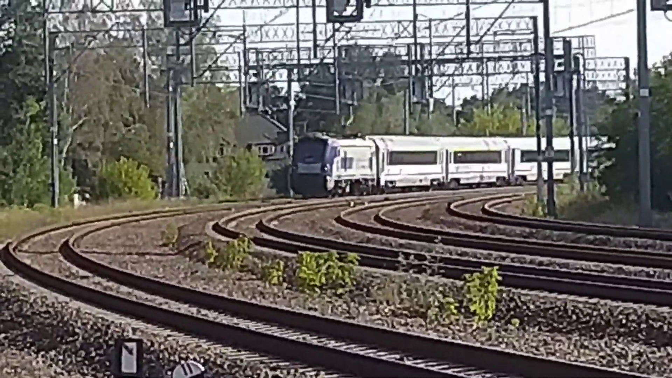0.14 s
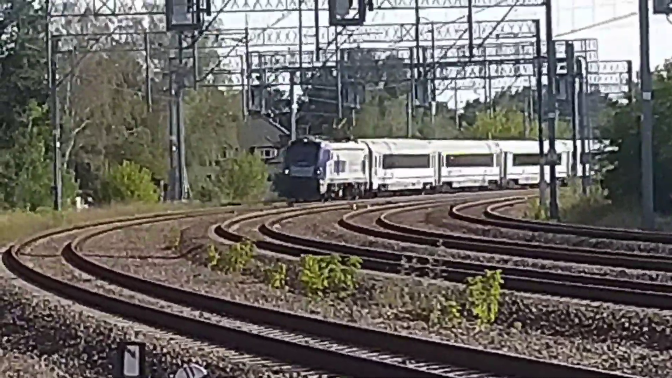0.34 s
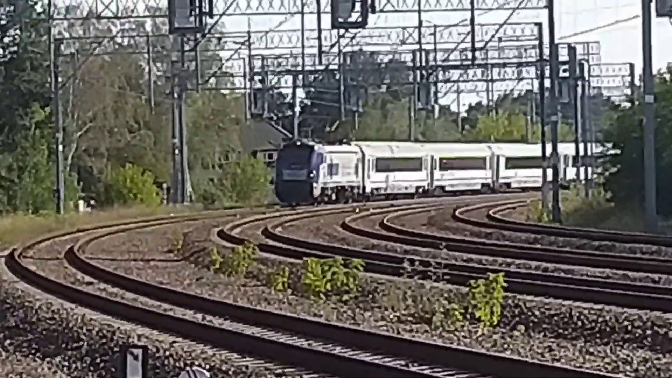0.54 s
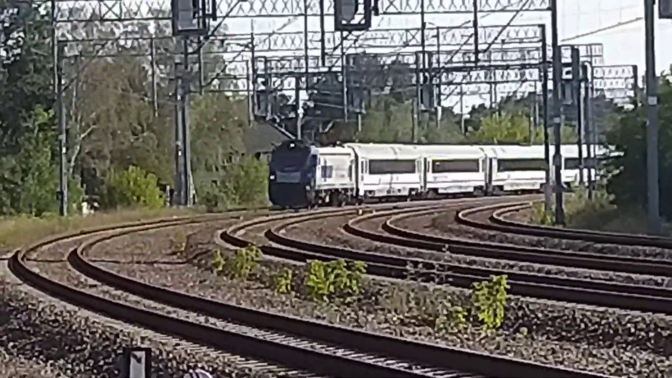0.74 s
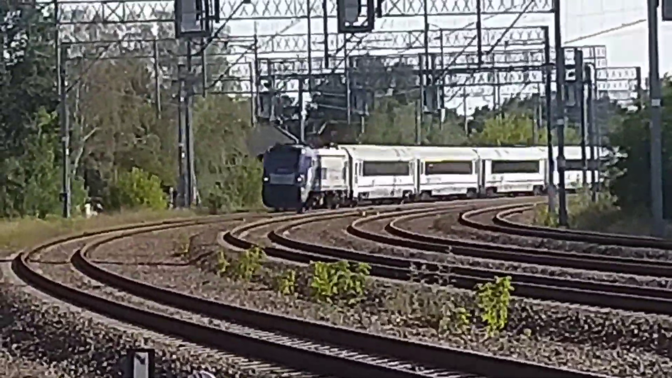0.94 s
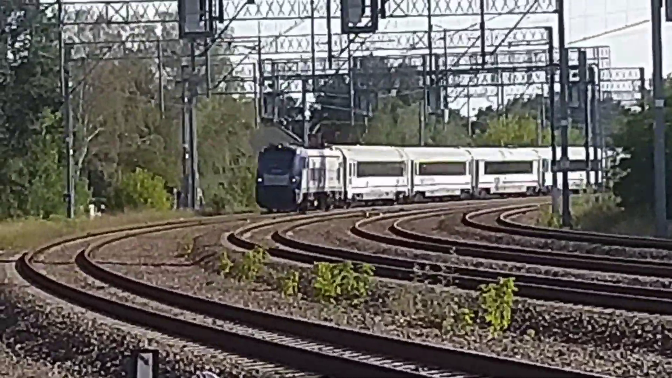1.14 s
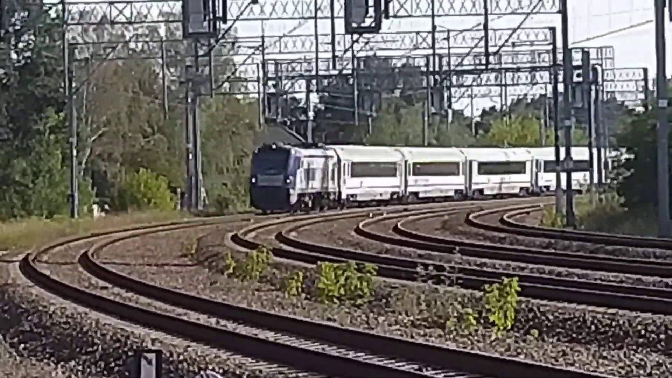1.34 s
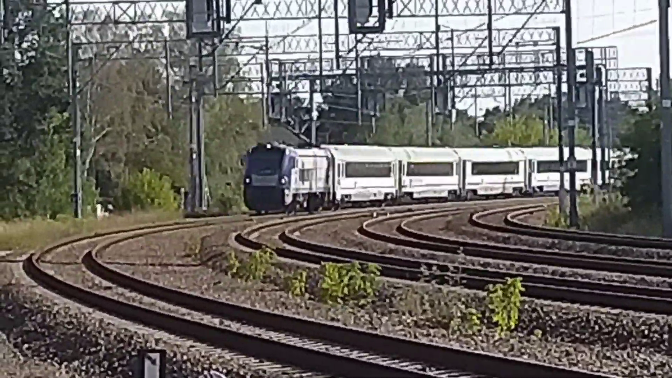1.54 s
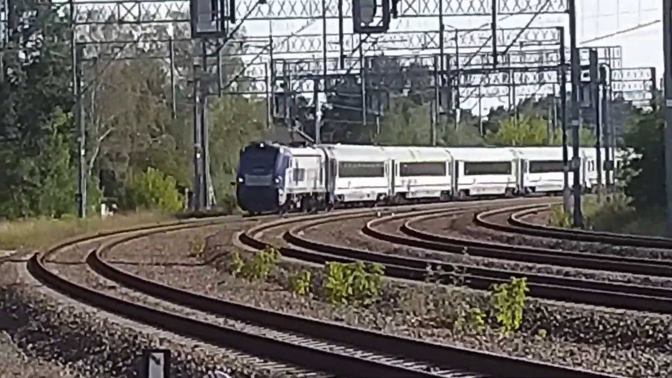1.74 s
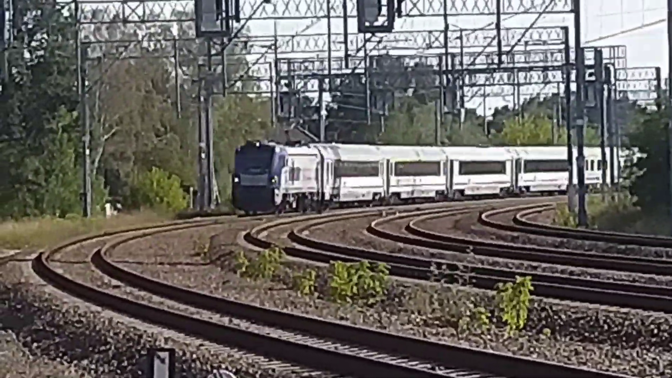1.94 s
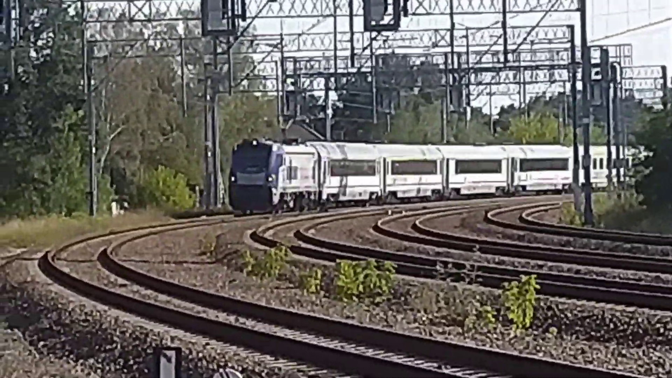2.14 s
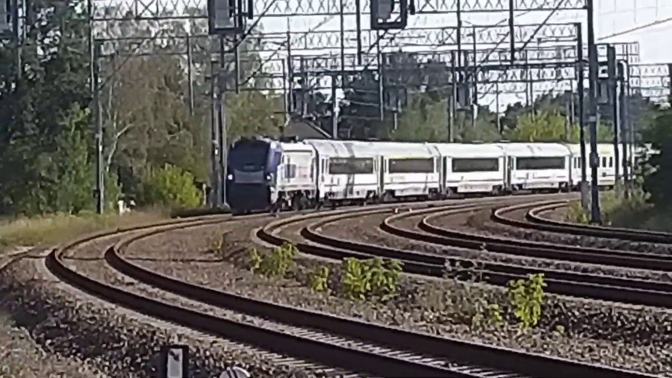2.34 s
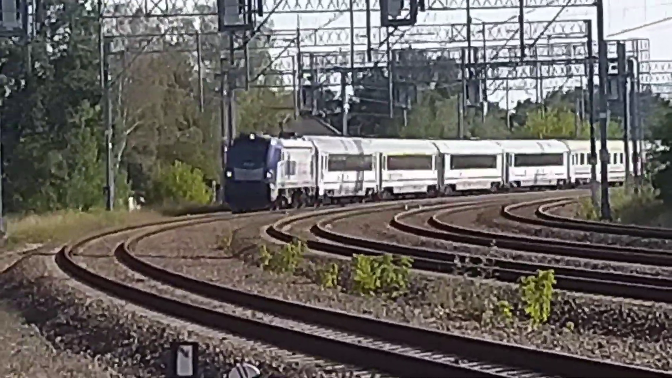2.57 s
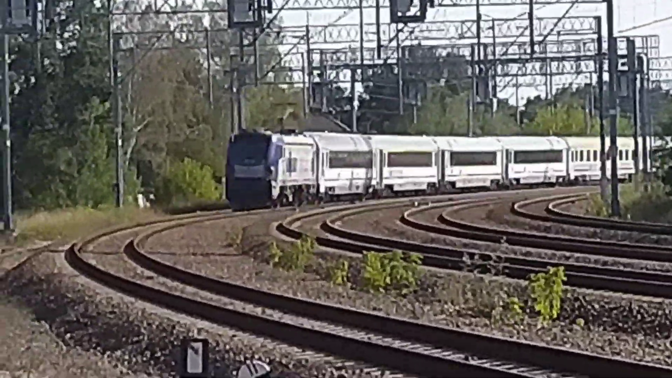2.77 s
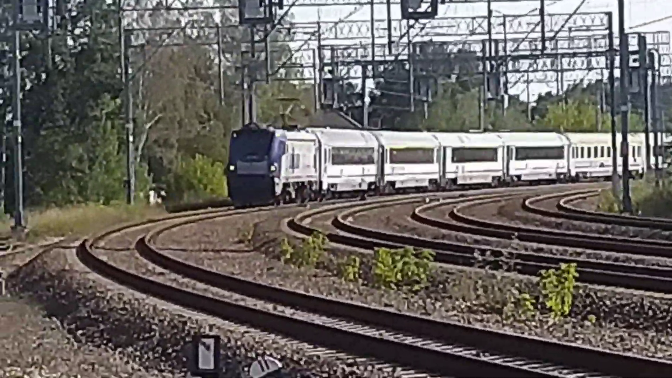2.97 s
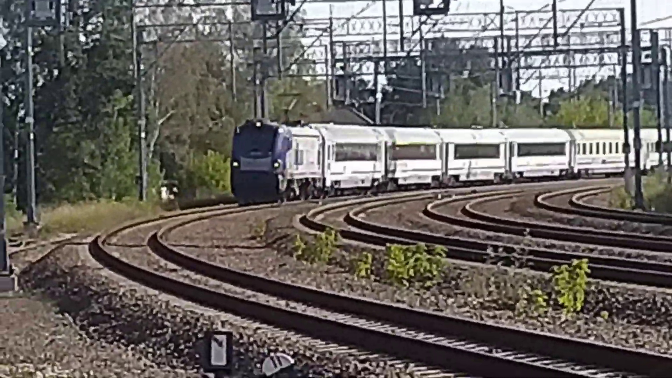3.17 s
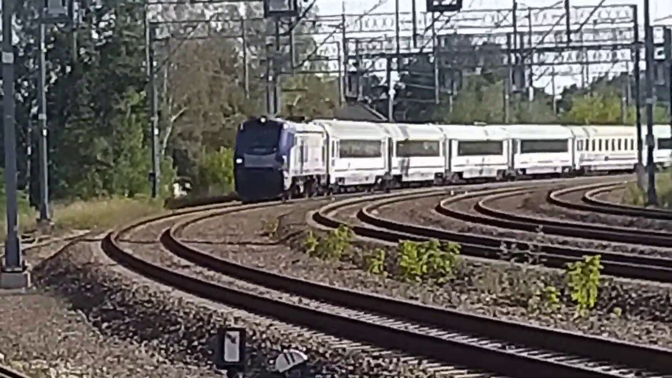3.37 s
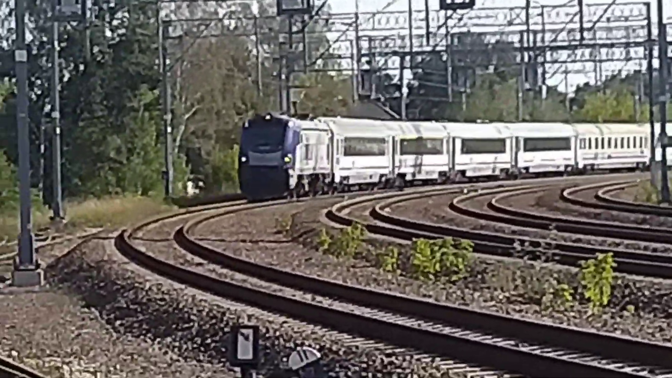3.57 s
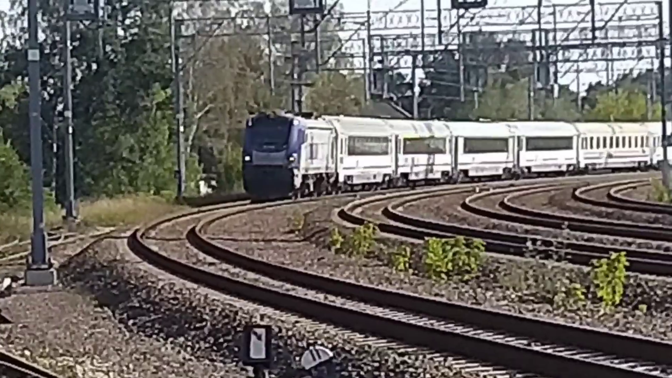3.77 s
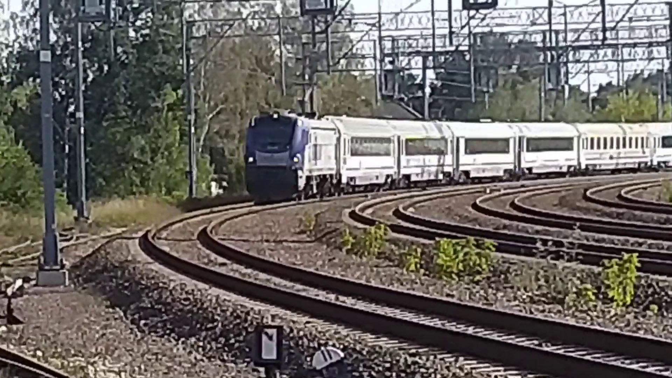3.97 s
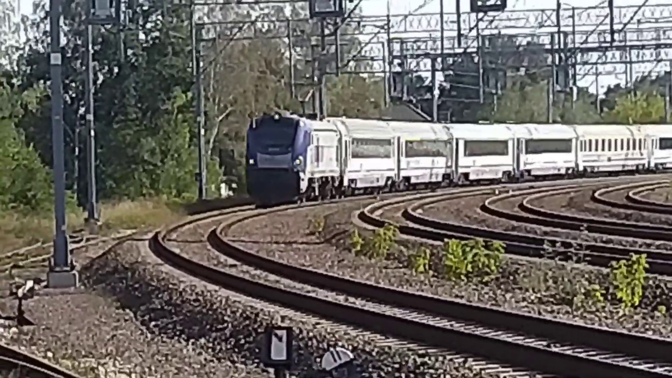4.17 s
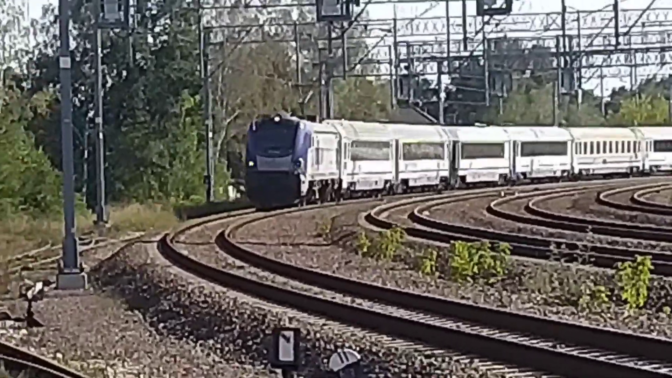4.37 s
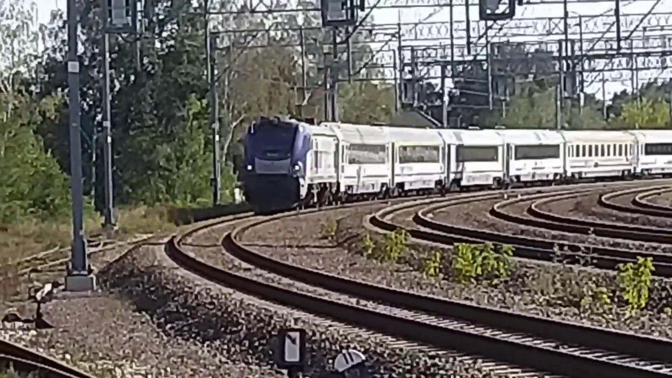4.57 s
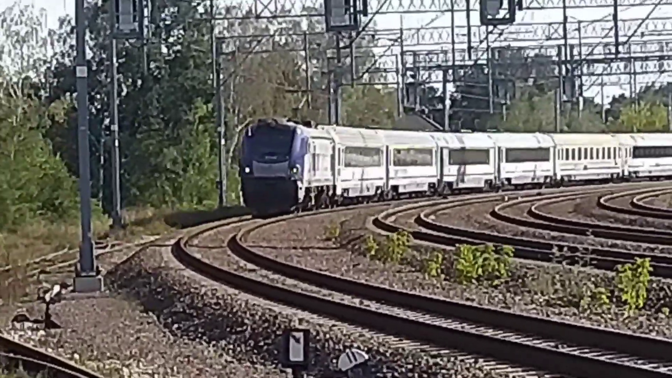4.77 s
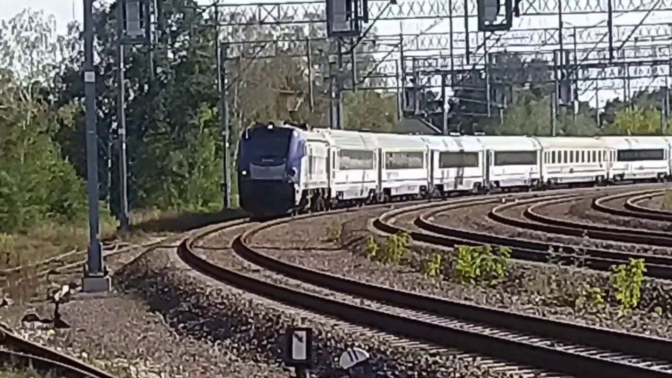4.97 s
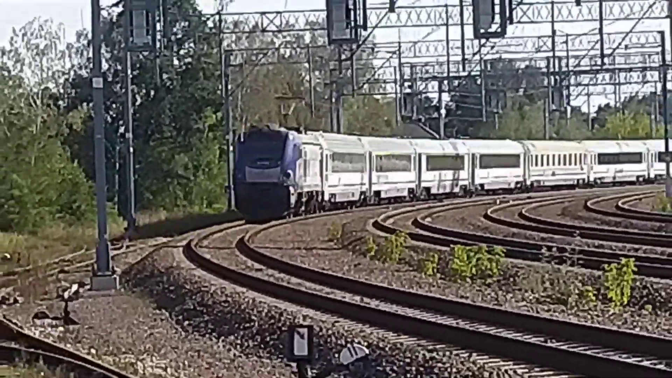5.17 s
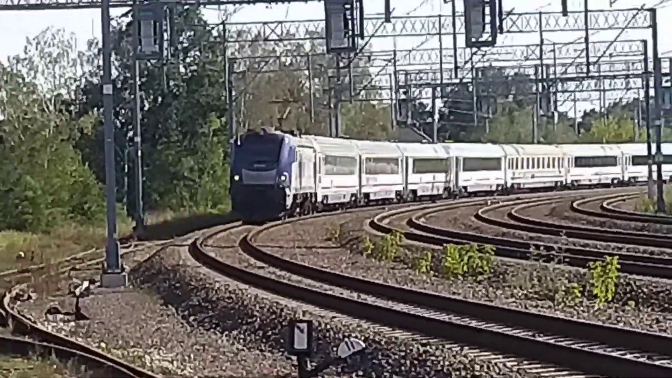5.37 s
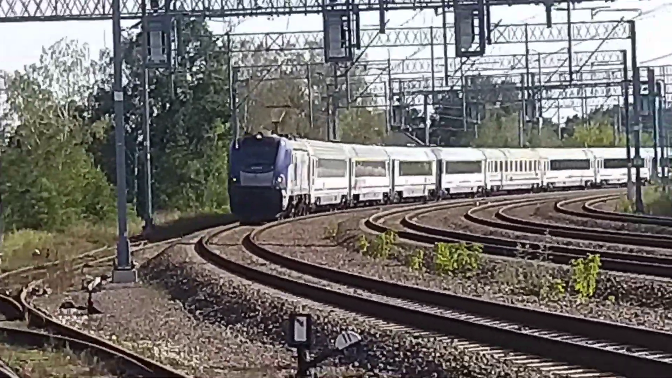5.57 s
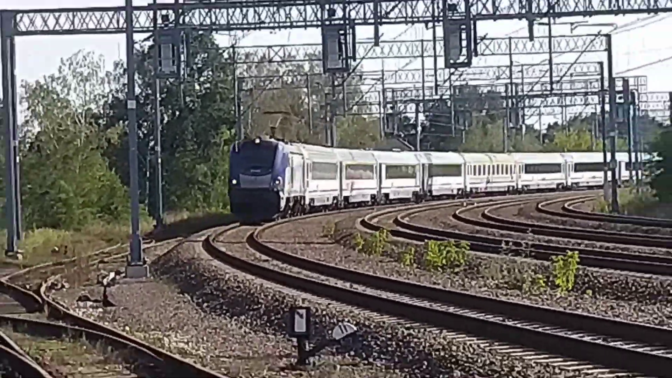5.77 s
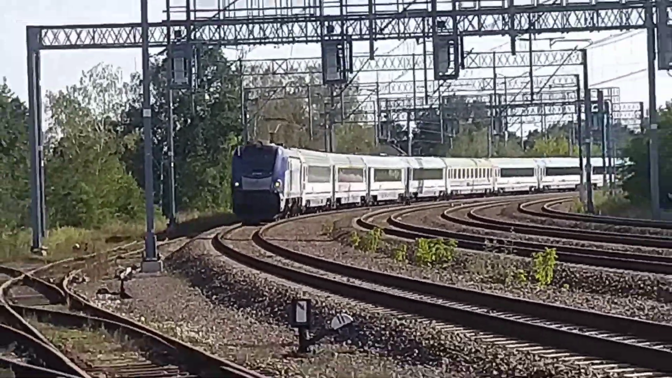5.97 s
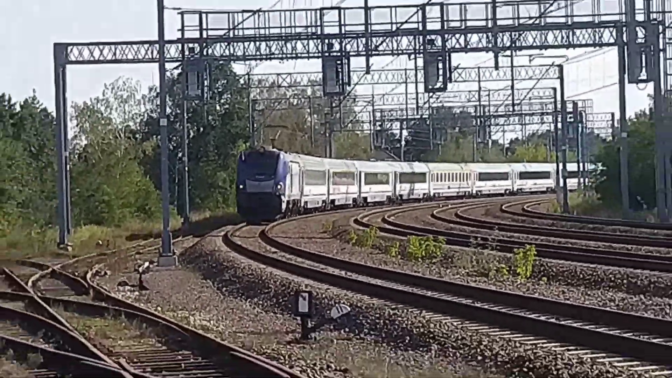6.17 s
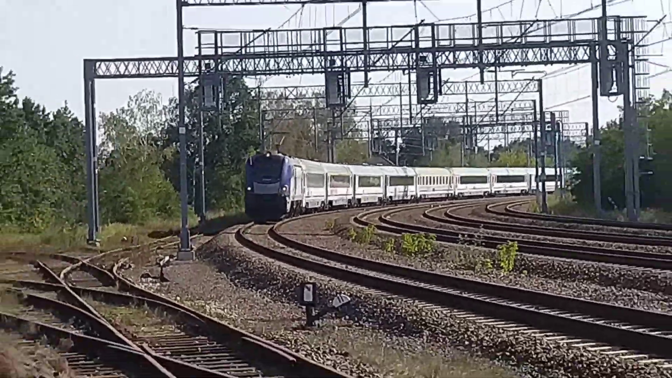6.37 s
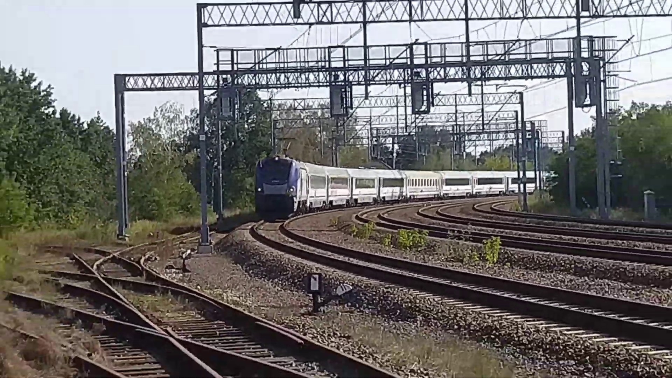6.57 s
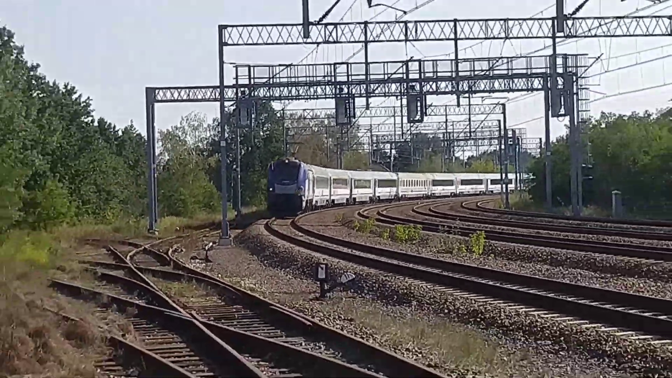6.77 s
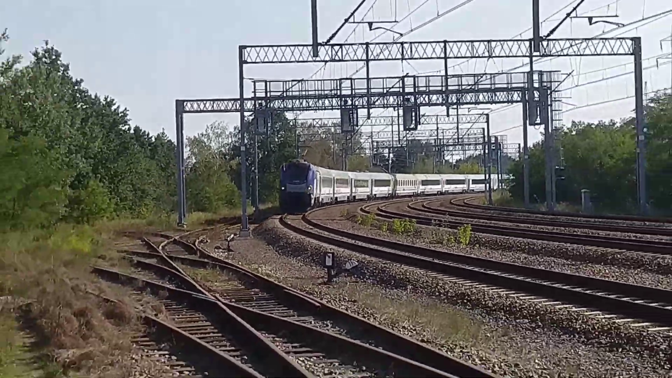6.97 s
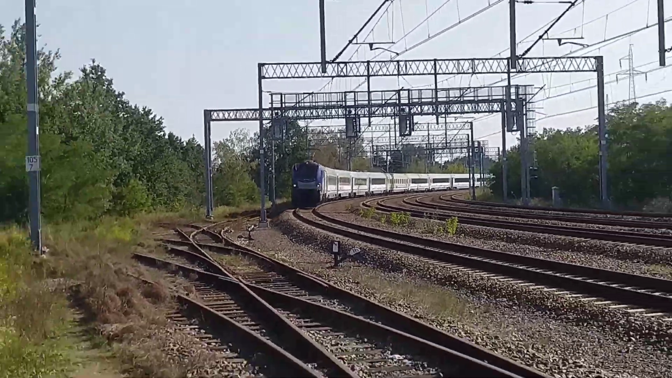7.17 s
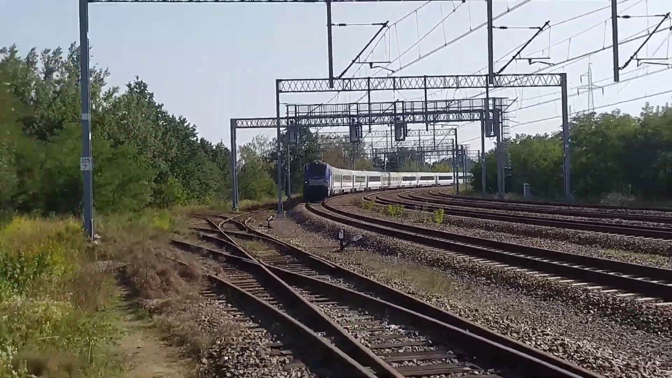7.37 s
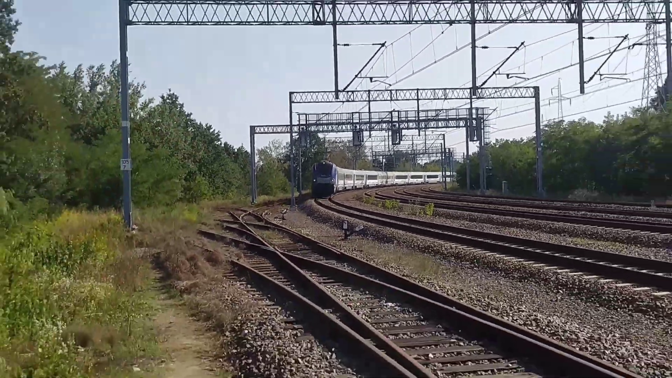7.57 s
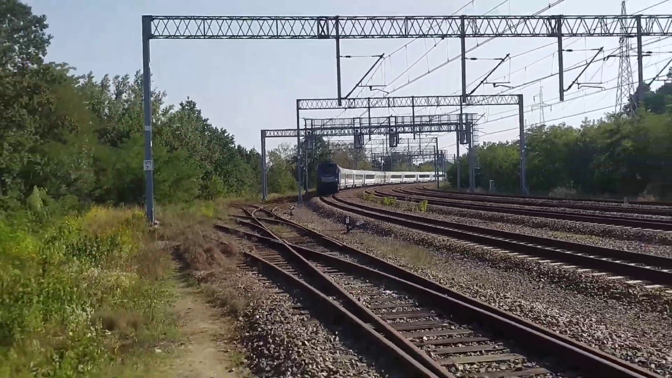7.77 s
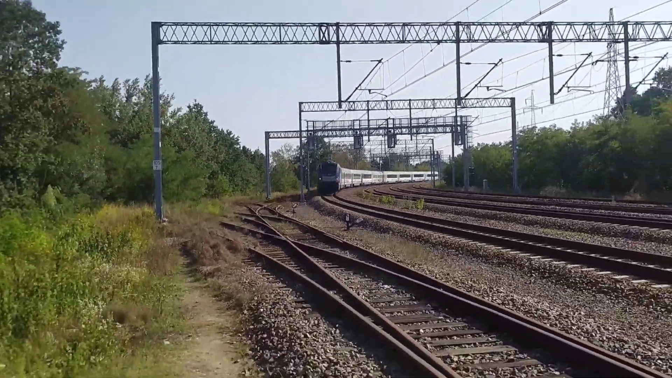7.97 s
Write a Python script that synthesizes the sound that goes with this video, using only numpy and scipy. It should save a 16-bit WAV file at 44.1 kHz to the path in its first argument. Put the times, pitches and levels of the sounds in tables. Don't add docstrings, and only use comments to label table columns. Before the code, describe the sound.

Outdoors beside a curved railway, a distant low hum and faint rail ringing open the scene. Brief, tiny high hisses come first, then from about one second longer sizzling grabs with a thin, extremely high squeal. The metallic rolling and airy roar of an approaching train grow steadily, pulsing about five times a second. A short knock on the handheld microphone comes past the middle; afterwards the hiss is stronger and more broken. Stereo treble leans right.

```python
import sys
import numpy as np
from scipy import signal
from scipy.fft import rfft, irfft, next_fast_len
from scipy.io import wavfile
from scipy.ndimage import uniform_filter1d, map_coordinates

SR = 44100
rng = np.random.default_rng(int(sys.argv[2]) if len(sys.argv) > 2 else 0)


def materialize(psi):
    bounded = np.clip(np.atleast_2d(psi).T, -1, 1)
    quanta = np.round(bounded * 32767).astype(np.int16)
    wavfile.write(sys.argv[1], SR, quanta)


def volts_from_decibels(level):
    exponent = np.asarray(level, float) / 20
    return 10 ** exponent


N = 353858
TIME_S = np.arange(N) / SR
WHEEL_TURN_S = 0.2003

# bite_s, release_s, hiss_db, sag_db_per_s
FLANGE_GRABS = [(0.224, .38, -64, 5), (0.401, 0.416, -64, 2), (0.462, 0.472, -62.5, 0),
                (0.52, .57, -63.5, 3), (0.798, 2.07, -53, 1), (2.129, 2.502, -52.5, -1.5),
                (2.581, 2.848, -52, 2), (2.928, 4.57, -52, -0.7), (4.878, 5.275, -45, 1),
                (5.421, 5.631, -48, -1.5), (5.892, 5.99, -49, -5), (6.061, 6.137, -46, -3),
                (6.226, 6.26, -47.5, -2), (6.321, 6.79, -46, -1), (6.899, 7.18, -43.5, 25),
                (7.245, 7.453, -46.5, 23), (7.534, 7.598, -45.5, 21), (7.674, 8.1, -48.5, 0.5)]


def at_hz(points, hz):
    point_hz, value = np.transpose(points)
    return np.interp(np.log(hz + 1), np.log(point_hz + 1), value)


def rms_one(x):
    return x / np.sqrt(np.mean(x ** 2) + 1e-20)


def evened(spectrum, size):
    return spectrum / np.sqrt(uniform_filter1d(abs(spectrum) ** 2, size=size))


def shaped(x, spectrum, modes=()):
    size = next_fast_len(N)
    hz = np.arange(size // 2 + 1) * SR / size
    inside = (hz > spectrum[0][0]) & (hz < spectrum[-1][0])
    gain = volts_from_decibels(at_hz(spectrum, hz)) * inside
    for centre, width, db in modes:
        gain = gain * (1 + (volts_from_decibels(db) - 1) / (1 + (2 * (hz - centre) / width) ** 2))
    return rms_one(irfft(rfft(x, size) * gain, size)[:N])


def drift(rate_hz):
    knots = rng.standard_normal(1200)
    return map_coordinates(knots, [TIME_S * rate_hz], order=3, mode="wrap")


def resonate(x, hz, width_hz):
    radius = np.exp(-np.pi * width_hz / SR)
    return signal.lfilter([1, 0, -1], [1, -2 * radius * np.cos(2 * np.pi * hz / SR), radius * radius], x)


def nearness():
    # time_s, level_db
    approach = [
        (0, -50.5),
        (3, -44.5),
        (6.1, -38),
        (8.02, -36),
    ]
    ring_db = np.interp(TIME_S, *np.transpose(approach))
    return ring_db, ring_db - ring_db[-1]


def swell(before_db, step_db, rate_db, lag=0):
    near_rail_s, crossing_s = 4.2, 0.87
    t = TIME_S - near_rail_s - lag
    return before_db + step_db * np.clip(t / crossing_s, 0, 1) + rate_db * np.maximum(t - crossing_s, 0)


def distant_hum():
    # hum_hz, density_db_per_hz
    hum_spectrum = [(12, -43.5), (20, -9.5), (38, -2.5), (51, 4), (63, -3.5), (87, -8.5), (201, -6.5),
                    (269, -14), (302, -11.5), (375, -16.5), (420, -14), (550, -21.5), (920, -120)]
    return volts_from_decibels(-50.5) * shaped(rng.standard_normal(N), hum_spectrum)


def faint_air():
    air_spectrum = [(5000, 8), (8000, 6.5), (12000, 3.0), (15000, -3.0)]   # Hz, dB per Hz
    level_db = -69.5 + 0.43 * nearness()[1]
    return volts_from_decibels(level_db) * shaped(rng.standard_normal(N), air_spectrum)


def far_tones():
    # tone_hz, wander_hz, level_db, fade_start_s, fade_db
    machine_tones = [
        (51, 1, -50.5, 1.25, -7),
        (441, 1.2, -62, 1.2, -9),
    ]
    out = np.zeros(N)
    for hz, wander_hz, db, until_s, drop_db in machine_tones:
        level_db = db + drop_db * np.clip(5 * (TIME_S - until_s), 0, 1)
        flutter = volts_from_decibels(1.2 * drift(2.0))
        phase = 2 * np.pi * np.cumsum(hz + wander_hz * drift(2.5)) / SR
        out += volts_from_decibels(level_db) * flutter * np.sin(phase)
    return out


def thump_and_knock():
    # start_s, peak_db, mode_hz, t60_s
    knocks = [
        (1.24, -26, 34, 0.16),
        (4.669, -13.5, 317, 0.016),
    ]
    out = np.zeros(N)
    for start_s, db, hz, t60_s in knocks:
        t = np.maximum(TIME_S - start_s, 0)
        decay = volts_from_decibels(db - 60 * t / t60_s)
        attack = 1 - np.exp(-t * hz * 0.58)
        upper_mode = np.sin(2 * np.pi * 2.7 * hz * t) * np.exp(-t * hz * 0.7)
        out += decay * attack * (np.sin(2 * np.pi * hz * t) + upper_mode)
    return out


def surroundings():
    return distant_hum() + faint_air() + far_tones() + thump_and_knock()


def tread_roughness(memory, fresh):
    bumps = rng.standard_normal((100, round(WHEEL_TURN_S * SR)))
    turns = signal.lfilter([np.sqrt(1 - memory ** 2)], [1, -memory], bumps, axis=0)
    rough = turns[50:].ravel()[:next_fast_len(N)]
    rough = rough + fresh * rng.standard_normal(len(rough))
    return rms_one(irfft(evened(rfft(rough), size=80), len(rough))[:N])


def worn_spots(spots):
    out, turns = np.zeros(N), np.arange(40)
    for place, hz, width_hz, db in spots:
        knocks = np.full(N, 1e-18)
        struck = ((turns + place) * WHEEL_TURN_S * SR).astype(int)
        knocks[np.minimum(struck, N - 1)] = volts_from_decibels(rng.normal(0, 1.8, 40))
        ring = resonate(resonate(knocks, hz, width_hz), hz, width_hz)
        out += volts_from_decibels(db) * rms_one(ring)
    return out


def rail_damping(x):
    gain_db = nearness()[1]
    low_db, high_db = -0.5 + 0.15 * gain_db, -1.77 - 0.39 * gain_db
    low = signal.sosfiltfilt(signal.butter(6, 830, "low", fs=SR, output="sos"), x)
    high = signal.sosfiltfilt(signal.butter(6, 1080, "high", fs=SR, output="sos"), x)
    return x + (volts_from_decibels(low_db) - 1) * low + (volts_from_decibels(high_db) - 1) * high


def rolling():
    # band_hz, density_db_per_hz
    rail_bands = [(500, -22), (580, -15), (602, -8), (655, -6), (688, -15), (706, -5), (870, -3),
                  (1000, -2), (1060, -7), (1200, -4.5), (1318, -2), (1355, -26), (1500, -40)]
    # band_hz, density_db_per_hz
    lowest_band = [(330, -30), (400, -15), (440, -8), (475, 0), (490, -2), (501, -16), (560, -30)]
    # mode_hz, width_hz, peak_db
    rail_modes = [(654, 11, 3), (772, 30, 3), (810, 12, 3), (873, 11, 9.5), (907, 10, 3), (968, 11, 4),
                  (1000, 12, 3), (1100, 50, 4.5), (1197, 12, 3), (1232, 16, 4), (1270, 14, 3),
                  (1295, 12, 3)]
    # place_on_tread (0-1), mode_hz, width_hz, level_db (re ring)
    tread_spots = [(.36, 873, 18, -5.5), (.92, 873, 20, -7.5), (.73, 873, 35, -16), (.96, 772, 32, -15),
                   (.5, 772, 26, -14), (.73, 772, 40, -18), (.33, 968, 32, -16), (.68, 968, 30, -17),
                   (.98, 968, 35, -17), (.35, 1230, 45, -18), (.9, 1200, 45, -19), (.22, 654, 24, -19)]
    # place_on_tread (0-1), mode_hz, width_hz, level_db (re band)
    low_spots = [(.9, 473, 24, -6), (.26, 473, 30, -9)]
    # band_hz, density_db_per_hz
    roar_spectrum = [(200, -22.5), (500, -7), (1000, 2.5), (1400, -8), (1570, -3.5), (1630, -5.5),
                     (1700, -1.5), (1790, -8), (2050, -6.5), (2400, 0.5), (2650, -8), (3250, -16.5),
                     (3750, -19.5), (3900, -20.5), (4650, -21), (7000, -22.5)]
    ring_db, gain_db = nearness()
    low_db = -49 + 1.7 * gain_db
    roar_db = -41.5 + 0.71 * gain_db + 0.084 * drift(7)
    rough = tread_roughness(memory=0.88, fresh=0.75)
    ring = volts_from_decibels(1.5) * shaped(rough, rail_bands, rail_modes) + worn_spots(tread_spots)
    low = volts_from_decibels(1.0) * shaped(rough, lowest_band) + worn_spots(low_spots)
    roar = shaped(rng.standard_normal(N), roar_spectrum)
    return volts_from_decibels(ring_db) * rail_damping(ring) + volts_from_decibels(low_db) * low + volts_from_decibels(roar_db) * roar


def grip(lag):
    bite_s = 0.002
    t = np.arange(0, N, 16) / SR - lag
    bite, release, db, sag = np.transpose(FLANGE_GRABS)[:, :, None]
    slide_db_per_s = np.where(db < -58, 422, 172)
    held = db - sag * (np.minimum(t, release) - bite)
    after = slide_db_per_s * np.maximum(t - release, 0)
    ahead = 30 * np.maximum(bite - t, 0) / bite_s
    each = held - after - ahead
    rub = swell(before_db=-71, step_db=7.5, rate_db=0, lag=0.8)[::16]
    return np.interp(np.arange(N) / 16, np.arange(len(t)), np.maximum(each.max(axis=0), rub))


def flange_hiss():
    # hiss_hz, density_db_per_hz
    hiss_spectrum = [(8900, -58), (9200, -21.5), (9500, -23.5), (9750, -26), (10800, -32.5), (11400, -13),
                     (12200, 3.5), (12700, -0.5), (13300, 3.5), (14000, -7), (14700, -9), (15200, -28)]
    # strip_hz, width_hz, peak_db
    hiss_strip = [(9490, 170, 5)]
    # hiss_hz, density_db_per_hz
    near_spectrum = [(8850, -29.5), (9050, -6.5), (9400, -13), (9700, -25), (10200, -13), (10500, -7.5),
                     (11000, -7), (11800, 5), (12400, -23.5)]
    noise, grip_db = rng.standard_normal(N), grip(0)
    chatter = volts_from_decibels(1.2 * drift(60) + 1.1 * drift(140))
    near_db = swell(before_db=-23, step_db=8.8, rate_db=3)
    hiss = volts_from_decibels(grip_db - 3.0) * chatter * shaped(noise, hiss_spectrum, hiss_strip)
    return hiss + volts_from_decibels(grip_db + near_db) * shaped(noise[::-1], near_spectrum)


def wheel_squeal():
    # mode_hz, width_hz, level_db
    squeal_modes = [(12721, 1.5, 0), (12688, 8, -13), (12814, 9, -11), (12845, 14, -10), (13050, 12, -17),
                    (13190, 12, -17), (11914, 12, -21), (13755, 10, -21)]
    locks_s, build_up_db_per_s, lock_needs_db = 1.17, 13, -57
    grip_db, noise = grip(0), rng.standard_normal(N)
    squeal_db = swell(before_db=4.77, step_db=-4.5, rate_db=-1)
    squeal_db = squeal_db - build_up_db_per_s * np.maximum(locks_s - TIME_S, 0)
    squeal_db = squeal_db - 60 * (TIME_S < FLANGE_GRABS[4][0])
    sides = sum(volts_from_decibels(db) * rms_one(resonate(noise, hz, width)) for hz, width, db in squeal_modes[1:])
    hz, wander_hz, db = squeal_modes[0]
    phase = 2 * np.pi * np.cumsum(hz + wander_hz * drift(10)) / SR
    line_db = db + 1.0 + 1.1 * drift(2.85) + swell(before_db=0, step_db=-5, rate_db=-3)
    line_db = line_db + np.minimum(grip_db - lock_needs_db, 0)
    return volts_from_decibels(grip_db + squeal_db) * (volts_from_decibels(line_db) * np.sin(phase) + sides)


def lower_waves():
    # wave_hz, density_db_per_hz
    lower_spectrum = [(6300, -19), (6420, -13.5), (6600, -14.5), (6900, -1), (7100, -9), (7250, -6.5),
                      (7400, -38), (7600, -61.5)]
    # mode_hz, width_hz, peak_db
    lower_modes = [(6493, 25, 8), (6648, 20, 4), (6850, 20, 5), (6978, 14, 9), (7099, 14, 8)]
    level_db = grip(lag=0.017) + swell(before_db=-4.5, step_db=3, rate_db=2.73)
    return volts_from_decibels(level_db) * shaped(rng.standard_normal(N), lower_spectrum, lower_modes)


def web_waves():
    # web_hz, density_db_per_hz
    web_spectrum = [(4800, -22), (5000, -9), (5250, 0), (5550, -1), (6000, -3), (6300, -12), (6500, -20)]
    smeared_db = uniform_filter1d(grip(lag=0.0054), size=SR // 12)
    level_db = 0.45 * (smeared_db + 49.5) + swell(before_db=-67.5, step_db=6, rate_db=2.26)
    return volts_from_decibels(level_db) * shaped(rng.standard_normal(N), web_spectrum)


def rail_whistle():
    level_db = swell(before_db=-96, step_db=16, rate_db=5.8)
    ring = resonate(rng.standard_normal(N), hz=9942, width_hz=14)
    return volts_from_decibels(level_db) * rms_one(ring * volts_from_decibels(0.47 * drift(7.6)))


def flange():
    return flange_hiss() + wheel_squeal() + lower_waves() + web_waves() + rail_whistle()


def two_ports(x):
    # port_hz, left_minus_right_db
    port_balance = [(60, 4.5), (92, 6.5), (140, 0.5), (210, 5.5), (320, 5), (500, 2), (760, 4),
                    (1150, -1.5), (1760, -8), (2680, -22), (4090, -6.5), (6240, -8.5), (9520, -13.5),
                    (14500, -42)]
    # port_hz, share_alike (0-1)
    port_likeness = [(40, 0.99), (300, 0.8), (800, 0.94), (1300, 0.64), (1900, 0.067), (3500, 0.28),
                     (6800, 0.66), (9500, .3), (12700, .55)]
    # port_hz, left_lead_rad
    port_phase = [(0, 0), (1100, .25), (3200, 2.6), (6500, 3.0), (15000, 3.9)]
    size = next_fast_len(N + SR // 4)
    hz, spectrum = np.arange(size // 2 + 1) * SR / size, rfft(x, size)
    scatter_s = np.arange(SR // 5) / SR
    scatter = rng.standard_normal(SR // 5) * volts_from_decibels(-60 * scatter_s / 0.22)
    scattered = evened(rfft(scatter, size), size=60)
    alike = np.clip(at_hz(port_likeness, hz), 0, 1)
    shadow = volts_from_decibels(at_hz(port_balance, hz))
    turn = np.exp(1j * np.interp(hz, *np.transpose(port_phase)))
    left = shadow * evened(alike * turn + np.sqrt(1 - alike ** 2) * scattered, size=60)
    ports = np.array([left, np.ones_like(left)])
    return irfft(2 * spectrum / (1 + shadow) * ports, size)[:, :N]


def scene():
    return two_ports(surroundings() + rolling() + flange())


def drop_weak_treble(x):
    # cell_hz, tilt_db
    mask_tilt = [(2400, 0), (4200, 1.5), (6300, 2), (8500, 0), (9500, -3.5), (10500, 1.5), (13200, 0),
                 (15200, 6)]
    mask_from_hz, treble_depth_db, loud_depth_db = 2400, -23.5, -35.5
    hz, _, cells = signal.stft(x, SR, "cosine", nperseg=2048)
    level = np.sqrt(uniform_filter1d(abs(cells) ** 2, size=6, axis=1) + 1e-24)
    broad = np.exp(uniform_filter1d(np.log(level), size=40, axis=1))
    treble_limit = volts_from_decibels(treble_depth_db) * broad[:, hz > 6000].max(axis=1)
    loud_limit = volts_from_decibels(loud_depth_db) * broad.max(axis=1)
    limit = uniform_filter1d(np.maximum(treble_limit, loud_limit), size=3)
    audible = level > limit[:, None] * volts_from_decibels(at_hz(mask_tilt, hz))[:, None]
    keep = audible | (hz < mask_from_hz)[:, None]
    return signal.istft(cells * keep, SR, "cosine", nperseg=2048)[1][:, :N]


def low_pass(x):
    return signal.sosfilt(signal.butter(12, 15120, fs=SR, output="sos"), x)


def record(dry):
    return low_pass(drop_weak_treble(dry))


dry = scene()
out = record(dry)
materialize(out)
```